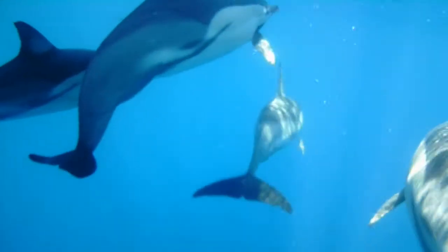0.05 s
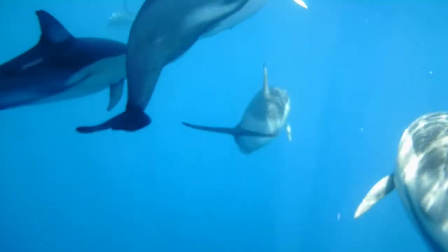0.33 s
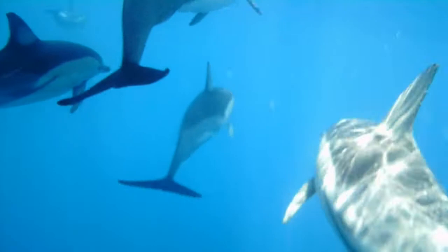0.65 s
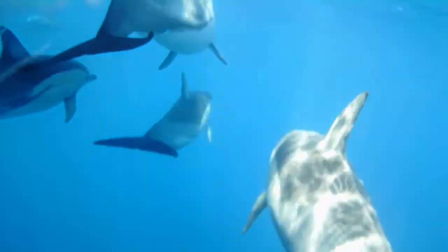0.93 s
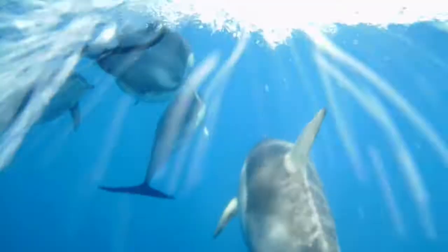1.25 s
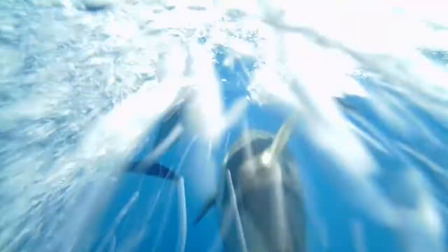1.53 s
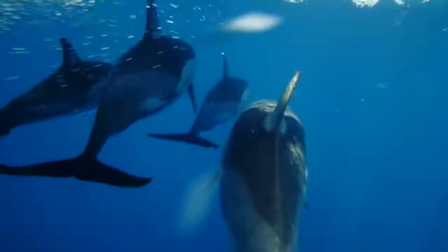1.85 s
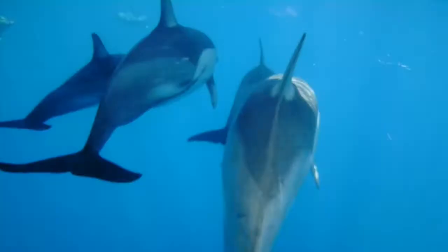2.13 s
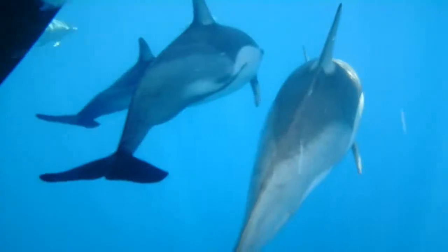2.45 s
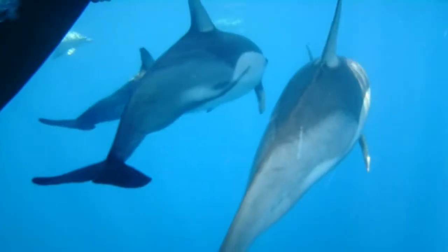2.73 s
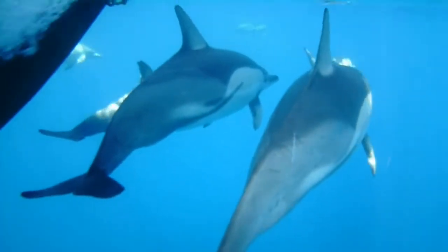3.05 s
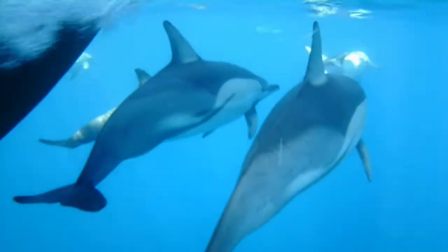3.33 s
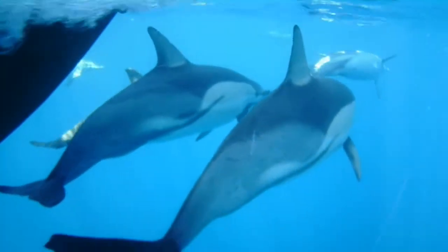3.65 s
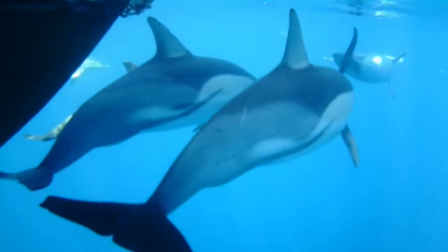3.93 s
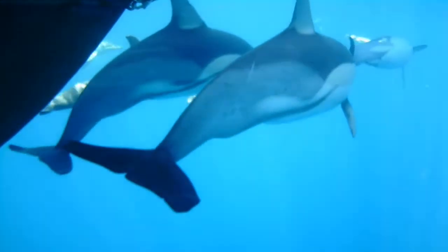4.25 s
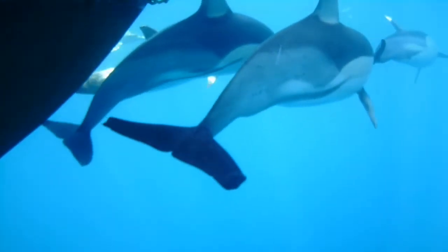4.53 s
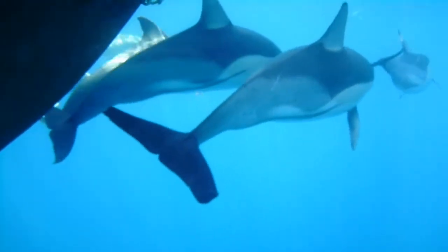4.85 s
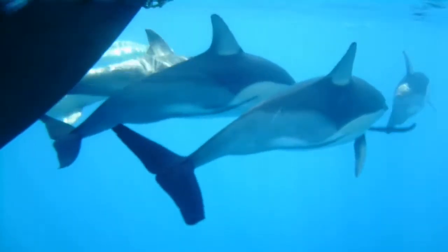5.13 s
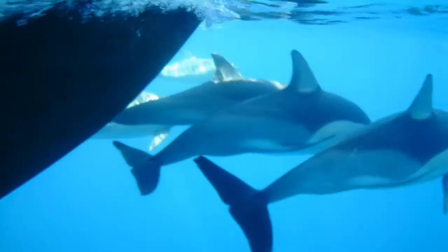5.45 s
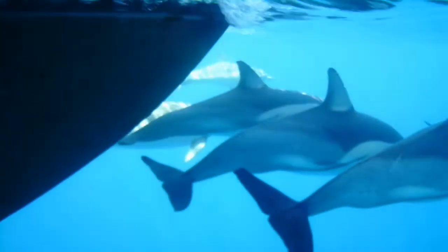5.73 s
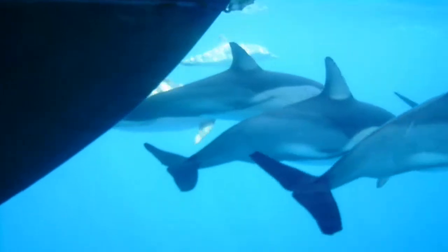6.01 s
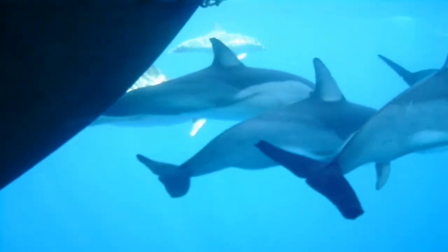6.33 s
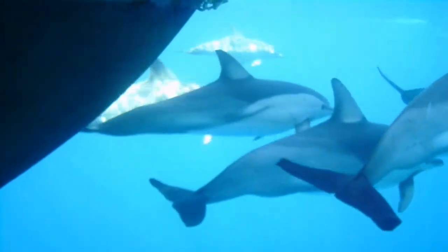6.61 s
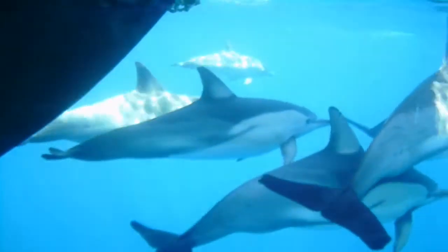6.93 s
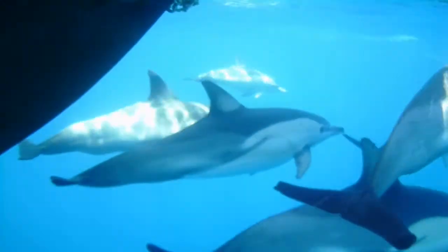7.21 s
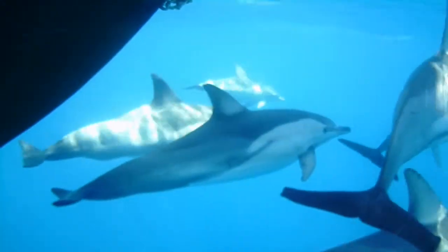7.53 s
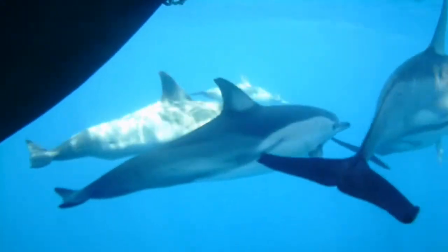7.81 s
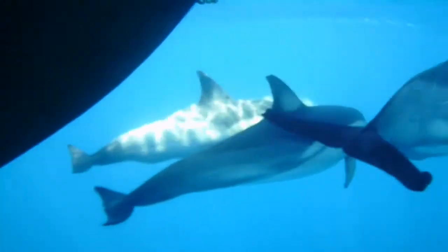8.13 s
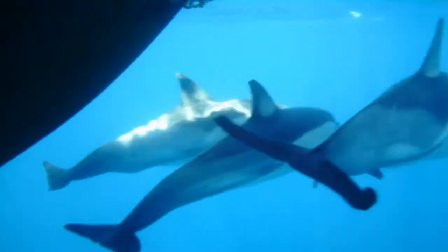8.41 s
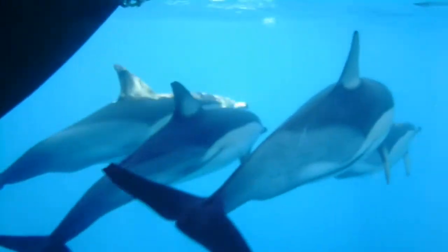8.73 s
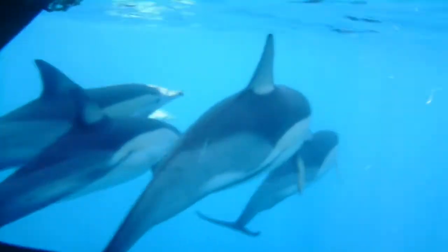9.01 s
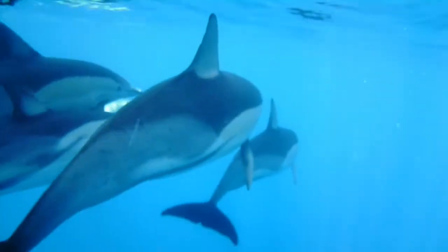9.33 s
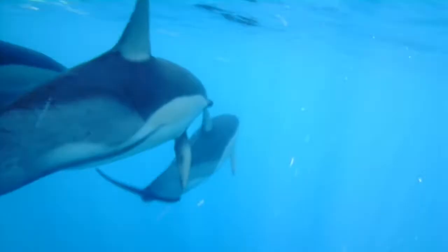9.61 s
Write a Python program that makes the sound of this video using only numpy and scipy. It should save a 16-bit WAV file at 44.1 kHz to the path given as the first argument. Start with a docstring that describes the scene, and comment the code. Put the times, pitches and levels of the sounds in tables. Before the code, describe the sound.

Underwater, bubbles gurgle and fizz in surges against a camera housing over the low drone of a moving boat.

```python
"""Water and bubbles stream over a camera's waterproof housing, pushed along under a boat's bow wave.
Turbulent eddies rumble on the case, air pockets glug against it and the hull hums. Each bubble
resonates as a mass of water on a spring of air: the smaller the bubble, the higher its pitch.
Clouds of foam babble and fizz past, and twice the camera hits a wall of foam with a slap.
The housing wall attenuates the treble of everything but one thin click."""
import sys
import numpy as np
from scipy import signal
from scipy.fft import rfft, irfft, next_fast_len
from scipy.io import wavfile
from scipy.ndimage import uniform_filter1d, map_coordinates

SR = 44100
rng = np.random.default_rng(int(sys.argv[2]) if len(sys.argv) > 2 else 0)


def store_wav(level_fs):
    """Save 16-bit WAV to argv[1]."""
    pcm = np.round(np.clip(np.atleast_2d(level_fs), -1, 1) * 32767)
    wavfile.write(sys.argv[1], SR, pcm.T.astype(np.int16))


N = 426447
TIME = np.arange(N) / SR


def amp(db):
    """Amplitude ratio of a level in decibels."""
    return 10 ** (np.asarray(db) / 20)


def unit(x):
    """Normalisation to rms 1."""
    return x / np.sqrt(np.mean(x ** 2) + 1e-20)


def contour(points):
    """Amplitude envelope through (time [s], level [dB]) points."""
    return amp(np.interp(TIME, *np.transpose(points)))


def swell(start, rise_s, hold_s, fade_db_per_s):
    """Envelope with a linear rise, a hold at 1 and an exponential decay."""
    age = TIME - start
    return np.clip(age / rise_s, 0, 1) * amp(-fade_db_per_s * np.maximum(age - rise_s - hold_s, 0))


def power_sum(gains):
    """Incoherent sources add in power."""
    return np.sqrt(sum(gain ** 2 for gain in gains))


def wobble(rate_hz):
    """Smooth random modulation through rate_hz knots a second."""
    return map_coordinates(rng.standard_normal(4096), [TIME * rate_hz], mode="wrap")


def coloured(x, response):
    """Minimum-phase filter of (frequency [Hz], gain [dB]) points: resonances ring after a blow."""
    size = 2 * next_fast_len(N // 2 + 8192)
    hz, db = np.transpose(response)
    log_hz = np.log(np.fft.rfftfreq(size, 1 / SR) + 1)
    gain = amp(np.interp(log_hz, np.log(hz), db))
    cepstrum = irfft(np.log(gain))[:size // 2]
    cepstrum[1:] *= 2  # folding the cepstrum makes the filter causal
    return irfft(rfft(x, size) * np.exp(rfft(cepstrum, size)))[:N]


def noise(spectrum):
    """Spectrally shaped Gaussian noise of rms 1."""
    return unit(coloured(rng.standard_normal(N), spectrum))


def low_pass(x, hz):
    """Elliptic filter with a steep cut above hz."""
    return signal.sosfilt(signal.ellip(10, .1, 80, hz, fs=SR, output="sos"), x)


def add(track, start, sound):
    """Superposition of a sound on a track from start [s]."""
    part = track[max(round(start * SR), 0):][:len(sound)]
    part += sound[:len(part)]


def bubble(t, hz, t60, glide, attack_s):
    """Damped breathing mode of a bubble, climbing in pitch as it nears the surface."""
    age = t / t60
    phase = 2 * np.pi * hz * t * (1 + glide * age / 2)
    return np.sin(phase) * 1000. ** -age * (1 - np.exp(-t / attack_s))


def swarm(low_hz, high_hz, cycles, spread_db, count, samples):
    """Superposition of random bubbles, even in power per Hz; each decays 60 dB in `cycles` periods."""
    when, pitch, strength = rng.random((count, 3)).T
    hz = low_hz * (high_hz / low_hz) ** pitch[:, None]
    excess_db = spread_db * np.minimum(-np.log(1 - strength[:, None]), 4)
    t = np.arange(samples) / SR
    rings = hz * amp(excess_db) * bubble(t, hz, t60=cycles / hz, glide=0.15, attack_s=0.27 / hz)
    places = (when * N).astype(int)[:, None] + np.arange(samples)
    return unit(np.bincount(places.ravel(), rings.ravel(), N)[:N])


def churn(bubbles, spectrum, far_db, flutter_db, flutter_hz):
    """Turbulence modulates near bubbles and the noise of countless far ones; rms 1."""
    water = bubbles + amp(far_db) * rng.standard_normal(N)
    flutter = amp(flutter_db * wobble(flutter_hz))
    return unit(coloured(water * flutter, spectrum))


# spectrum of the hull's hum: (frequency [Hz], gain [dB])
HULL_SPECTRUM = [(8, -28.5), (14, -12.5), (28, -0.5), (37, -2), (43, 2.5), (49, 4), (58, -6.5), (90, -64.5)]
# strength of the hum: (time [s], level [dB])
HULL_LEVELS = [(0, -30.5), (.45, -36), (.95, -29.5), (1.35, -37), (2.28, -28.5), (2.5, -33.5), (4.2, -33.5),
               (5.1, -28), (5.6, -40), (6.05, -33), (6.85, -27), (7.45, -39), (7.95, -31), (8.85, -29.5),
               (9.2, -37.5), (9.45, -30.5)]
def hull_drone():
    """Low-frequency radiation from the hull: a deep, unsteady band of noise."""
    hum = noise(HULL_SPECTRUM)
    running_rms = np.sqrt(np.abs(uniform_filter1d(hum ** 2, size=SR // 3)))
    return contour(HULL_LEVELS) * hum / running_rms


# strength of the stream along the case: (time [s], relative level [dB])
FLOW_LEVELS = [(0, -23), (.3, -39), (1.0, -30), (1.45, -26), (1.8, -21), (2.15, -26), (2.6, -23),
               (2.9, -31), (3.65, -16), (4.15, -22.5), (4.78, -26.5), (5.05, -31), (5.33, -18), (5.6, -43),
               (6.0, -22), (6.8, -26), (7.8, -28), (9.67, -27.5)]
# large eddies rolling over the case: (time [s], hold [s], level [dB])
EDDY_ROLLS = [(.53, 0.0096, -24), (0.647, 0.014, -24.5), (1.355, 0.038, -26), (1.593, 0.3, -20.5),
              (1.94, 0.025, -17), (2.48, 0.032, -26), (3.173, 0.039, -27), (3.55, 0.048, -23.5),
              (3.79, 0.032, -21), (4.727, .08, -28), (5.44, 0.46, -29), (5.86, 0.1, -16.5),
              (6.07, 0.23, -24.5), (6.35, .03, -27), (6.75, 0.013, -19.5), (7.02, .015, -19.5),
              (7.46, 0.066, -22.5), (7.6, 0.63, -38.5)]
# eddies and large bubbles as heard through the case: (frequency [Hz], gain [dB])
EDDY_SPECTRUM = [(20, -9), (60, -9), (80, -1), (130, -3.5), (250, -2.5), (330, -1), (600, -49.5)]
GURGLE_SPECTRUM = [(130, -36), (240, -9.5), (300, -8), (355, -2), (393, 4), (415, -4), (440, -0.5),
                   (485, -7.5), (528, -2.5), (590, -13.5), (680, -17), (800, -24.5), (1400, -52)]
def stream():
    """Turbulent pressure buffets the case and large bubbles resonate; both follow flow and slaps."""
    flow, slap = contour(FLOW_LEVELS), slap_envelope()
    rolls = power_sum(amp(db) * swell(start, rise_s=0.0076, hold_s=hold, fade_db_per_s=196)
                      for start, hold, db in EDDY_ROLLS)
    deep_bubbles = swarm(105, 330, cycles=5.65, spread_db=3.5, count=1000, samples=2400)
    eddies = churn(deep_bubbles, EDDY_SPECTRUM, far_db=11.5, flutter_db=1, flutter_hz=22)
    large_bubbles = swarm(238.2, 674.5, cycles=15, spread_db=1, count=2000, samples=2000)
    gurgle = churn(large_bubbles, GURGLE_SPECTRUM, far_db=3, flutter_db=1, flutter_hz=20)
    eddy_gain = power_sum([amp(-7) * flow, amp(-2.5) * slap, rolls])
    gurgle_gain = power_sum([amp(0.5) * flow, amp(-3) * slap])
    return eddy_gain * eddies + gurgle_gain * gurgle


# panel resonances of the case in open water: (frequency [Hz], gain [dB])
PANEL_RESPONSE = [(700, -3), (840, 9.5), (1000, -14), (1150, 2), (1500, 4), (1800, -21), (1990, 11),
                  (2200, -4.5), (2450, -4), (3000, -12.5), (3900, -21), (4300, -17.5), (4800, -5),
                  (5450, -29), (6100, -31.5), (6900, -58)]
def wash():
    """Forced vibration: even flow keeps the case murmuring and tiny bubbles excite its panels."""
    specks = swarm(1500, 6000, cycles=12, spread_db=2.2, count=3000, samples=500)
    hiss = churn(specks, PANEL_RESPONSE, far_db=0, flutter_db=1.5, flutter_hz=40)
    return amp(-39) * noise(EDDY_SPECTRUM) + amp(-33.5) * noise(GURGLE_SPECTRUM) + amp(-48.5) * hiss


# passing foam: (time [s], rise [s], hold [s], decay [dB/s], froth level [dB], fizz level [dB])
FOAM_CLOUDS = [(0, 0.046, 0.082, 47, -38, -41), (1.074, 0.025, 0.59, 24, -25, -27),
               (1.384, .012, 0.045, 40, -32, -24.5), (1.68, 0.021, 0.061, 74, -22.5, -22),
               (2.396, 0.096, .09, 50, -36, -37), (2.987, 0.046, .05, 42, -37.5, -44.5),
               (3.167, 0.064, 0.037, 35, -32.5, -34.5), (3.358, 0.21, 0.12, 54, -22.5, -27),
               (3.774, 0.036, 0.03, 26, -31, -28), (4.673, 0.04, 0.05, 13, -41, -37.5),
               (5.214, 0.045, 0.075, 36, -21, -23.5), (5.452, 0.11, 0.51, 50, -24, -27.5),
               (5.94, 0.21, .17, 53, -41, -29.5), (6.458, .1, 0.25, 3.5, -45.5, -47.5),
               (7.001, 0.021, 0.028, 44.5, -49.5, -36)]
# froth and fizz as heard through the case: (frequency [Hz], gain [dB])
FROTH_SPECTRUM = [(350, -30.5), (580, -1), (720, -1), (870, -2.5), (1020, -9), (1200, -9.5), (1400, -15.5),
                  (1800, -19), (3500, -60)]
FIZZ_SPECTRUM = [(800, -42), (1300, -6), (1550, -6), (1780, -2.5), (2030, 2.5), (2400, -5), (2950, -4.5),
                 (3500, -11.5), (3900, -16.5), (4300, -12), (4800, -14.5), (5500, -27), (6200, -26.5),
                 (7000, -28.5)]
def foam():
    """Resonance rises as radius falls: middle-sized bubbles babble, the smallest fizz on the case."""
    def surviving(gains, thin_db):
        """Dissolution: foam weaker than thin_db mostly vanishes before it reaches the case."""
        gain = power_sum(gains)
        return gain / np.sqrt(1 + (amp(thin_db) / gain) ** 2)

    froth_gains, fizz_gains = [amp(-44.5)], [amp(-49.5)]  # ever-present thin foam
    froth_gains.append(amp(-4) * slap_envelope())
    for start, rise, hold, fade, froth_db, fizz_db in FOAM_CLOUDS:
        passing = swell(start, rise, hold, fade)
        froth_gains.append(amp(froth_db) * passing)
        fizz_gains.append(amp(fizz_db) * passing)
    babble = swarm(577, 1558, cycles=18, spread_db=1, count=3200, samples=1200)
    froth = churn(babble, FROTH_SPECTRUM, far_db=10.5, flutter_db=2.3, flutter_hz=59)
    crackle = swarm(1300, 6000, cycles=13, spread_db=3.2, count=9000, samples=500)
    fizz = churn(crackle, FIZZ_SPECTRUM, far_db=4.5, flutter_db=2, flutter_hz=70)
    return surviving(froth_gains, thin_db=-47.5) * froth + surviving(fizz_gains, thin_db=-48.5) * fizz


def stray_bubbles():
    """Amplitude modulation groups the soft pops of small drifting bubbles into loose bunches."""
    pops = swarm(950, 3800, cycles=20, spread_db=3, count=500, samples=1200)
    bunches = amp(4 * wobble(rate_hz=14))
    spectrum = [(600, -19), (1200, 5), (1700, -8), (2200, -11), (3200, -12), (4500, -14.5), (7000, -44.5)]
    return amp(-51.5) * unit(coloured(pops * bunches, spectrum))


# single small bubbles beside the case: (time [s], level [dB], frequency [Hz])
NEAR_BUBBLES = [(.08, -26, 3600), (.081, -27, 856), (.333, -30, 4130), (.349, -29, 1200), (.599, -27, 2230),
                (0.754, -27, 2400), (1.09, -19, 1030), (2.099, -19, 1146), (2.131, -17.5, 2960),
                (2.585, -13, 2000), (2.603, -24, 1300), (2.953, -24.5, 3070), (3.035, -24, 790),
                (3.192, -20.5, 4160), (3.236, -18.5, 1410), (3.389, -14.5, 1930), (3.423, -2, 2090),
                (3.424, -6.5, 2480), (3.596, -10, 2460), (3.654, -6.5, 2230), (4.133, -13, 2040),
                (5.248, -6.5, 2060), (5.555, -7, 2010), (5.593, -8.5, 930), (5.618, -7, 2720),
                (5.623, -3.5, 980), (5.65, -9, 880), (5.754, -5, 900), (5.861, -6.5, 920),
                (6.58, -24, 1876), (6.702, -26, 1960), (6.792, -28, 1620), (7.114, -21, 2100),
                (7.117, -25, 2900), (7.817, -23, 840), (8.272, -27, 1350), (8.336, -27, 1930),
                (8.429, -33, 1100), (8.531, -23, 1110), (8.74, -33, 1125), (9.463, -26, 1640)]
def plinks():
    """Free oscillation after pinch-off: at constant Q, a smaller bubble rings more briefly."""
    rings = np.zeros(N)
    t = np.arange(SR // 8) / SR
    for start, db, hz in NEAR_BUBBLES:
        add(rings, start, amp(db) * bubble(t, hz, t60=42 / hz, glide=0.099, attack_s=0.00059))
    return rings


# air pockets bursting on the case: (time [s], peak level [dB], frequency [Hz], 60 dB decay time [s])
AIR_POCKETS = [(.093, -14, 480, .047), (0.168, -13.5, 395, 0.035), (.465, -17.5, 360, 0.031),
               (.645, -22.5, 625, 0.037), (0.905, -26, 493, 0.073), (1.1, 3.5, 443, 0.023),
               (1.108, -3, 428, 0.087), (1.132, -9.5, 252, 0.073), (1.145, -1.5, 490, 0.046),
               (1.972, -7, 305, 0.05), (2.032, -11.5, 352, 0.12), (2.06, -4, 344, 0.087),
               (2.181, -13.5, 321, 0.04), (2.321, -6.5, 392, 0.043), (2.387, -16.5, 374, 0.34),
               (2.524, -12.5, 377, 0.12), (2.67, -13.5, 343, .08), (2.766, -11.5, 369, 0.064),
               (2.957, -9.5, 388.5, 0.094), (3.188, -15.5, 516, 0.25), (3.282, -12.5, 379, .13),
               (3.414, -9, 637, 0.065), (3.442, -3.5, 371, 0.072), (3.596, 0.5, 391, 0.064),
               (3.646, -10.5, 363, 0.17), (3.711, -9, 320, 0.054), (3.806, -7.5, 404, 0.11),
               (4.2, -21, 576, 0.039), (4.293, -14.5, 343, 0.14), (4.406, -26.5, 548, 0.08),
               (5.214, -12, 538, 0.084), (5.262, -6, 410, .056), (5.298, -8.5, 430, 0.039),
               (6.08, -5, 312, 0.047), (6.216, -7.5, 343, 0.088), (6.365, -2, 342, 0.078),
               (6.393, -3, 339, 0.046), (6.524, -14, 374, .09), (6.78, -16.5, 426, .08),
               (7.036, -11.5, 384.5, 0.14), (7.238, -14, 344, 0.24), (7.515, -16, 393, .1),
               (8.101, -13.5, 387, 0.11), (8.226, -10, 418, 0.06), (8.527, -15.5, 400.4, 0.22),
               (8.639, -12.5, 407, 0.058), (8.789, -15, 446, 0.14), (8.935, -19, 387, 0.087),
               (9.15, -19.5, 484, 0.18), (9.344, -12.5, 395, 0.1), (9.385, -12, 372, 0.036)]
def glugs():
    """A large air volume resonates low; each pocket also shoves the case and sheds a splash of fizz."""
    shove_db, splash_db = -19, -33.5  # relative to the pocket's peak
    rings, shoves, splashes = np.zeros((3, N))
    t = np.arange(SR // 4) / SR
    for start, db, hz, t60 in AIR_POCKETS:
        ring = bubble(t, hz, t60, glide=0.08, attack_s=0.002)
        add(rings, start, amp(db) * ring / np.abs(ring).max())
        add(shoves, start, amp(db + shove_db - 60 * t / 0.036))
        add(splashes, start, amp(db + splash_db - 60 * t / 0.043))
    rumble = noise(EDDY_SPECTRUM)
    spray = noise(FIZZ_SPECTRUM) + noise(FROTH_SPECTRUM)
    return rings + shoves * rumble + splashes * spray


# bubbles collapsing on the case: (time [s], snap level [dB], knock level [dB])
COLLAPSES = [(.093, -25, -14), (.1737, -25, -33), (0.4685, -40, -21), (.866, -43, -30), (.909, -43, -23),
             (1.108, -4.5, -6), (1.3816, -28, -11), (1.52, -9, -13), (2.1295, -17.5, -24),
             (2.3241, -41, -20), (2.6464, -28, -15), (2.953, -34, -17), (3.0087, -40, -12.5),
             (3.239, -24, -9), (3.285, -35, -12.5), (3.5276, -20, -9.5), (3.601, -13, -5),
             (4.012, -37, -17), (4.0337, -26, -12.5), (4.408, -38, -25), (5.2433, -34, -6),
             (5.7094, -27, -21), (5.7548, -25, -23), (7.039, -22, -16), (7.511, -31, -19),
             (9.0008, -23.5, -36), (9.4677, -21, -23)]
# the case's bright and dull responses to a blow: (frequency [Hz], gain [dB])
SNAP_RESPONSE = [(300, -22.5), (800, -14.5), (1500, -7.5), (2050, 10.5), (2600, -7), (3400, -1),
                 (4000, -5.5), (4700, -8), (5600, -34.5), (7000, -27)]
KNOCK_RESPONSE = [(80, -17.5), (250, 5), (400, -9.5), (550, 16), (800, 1), (1100, -17), (2000, -22),
                  (5000, -64.5)]
def ticks():
    """Impulse response: the case answers each collapse's pressure pulse with a snap and a dull knock."""
    def struck(response):
        ring = coloured(signal.unit_impulse(N), response)[:SR // 20]
        return ring / np.abs(ring).max()

    track = np.zeros(N)
    snap, knock = struck(SNAP_RESPONSE), struck(KNOCK_RESPONSE)
    for start, snap_db, knock_db in COLLAPSES:
        add(track, start, amp(snap_db) * snap + amp(knock_db) * knock)
    return track


# the camera hits a wall of foam: (time [s], hold [s], relative level [dB])
FOAM_IMPACTS = [(1.071, 0.045, -10), (5.243, 0.063, -15)]
def slap_envelope():
    """Transient excitation: each impact briefly drives the eddies, gurgle and froth."""
    return power_sum(amp(db) * swell(start, rise_s=0.03, hold_s=hold, fade_db_per_s=161)
                     for start, hold, db in FOAM_IMPACTS)


def click(time_s=2.0235, peak_db=-19):
    """A lone impulse has a flat spectrum: one thin, bright click."""
    return amp(peak_db) * signal.unit_impulse(N, round(time_s * SR))


# transmission through the housing wall: (frequency [Hz], gain [dB])
WALL_RESPONSE = [(5900, 0), (6400, -5), (6800, -17), (7200, -45)]
def housing_wall(water):
    """Transmission loss: the wall takes the treble off the water's sounds."""
    return low_pass(coloured(water, WALL_RESPONSE), hz=7000)


def scene():
    """Superposition at one microphone: the water's sounds through the wall, and the undulled click."""
    water = hull_drone() + wash() + stream() + foam() + stray_bubbles() + plinks() + glugs() + ticks()
    return (housing_wall(water) + click())[None]


def record(dry):
    """Hard clipping of peaks that overload the input, followed by the camera's band limit."""
    return low_pass(np.clip(dry, -1, 1), hz=16000)


dry = scene()
out = record(dry)
store_wav(out)
```